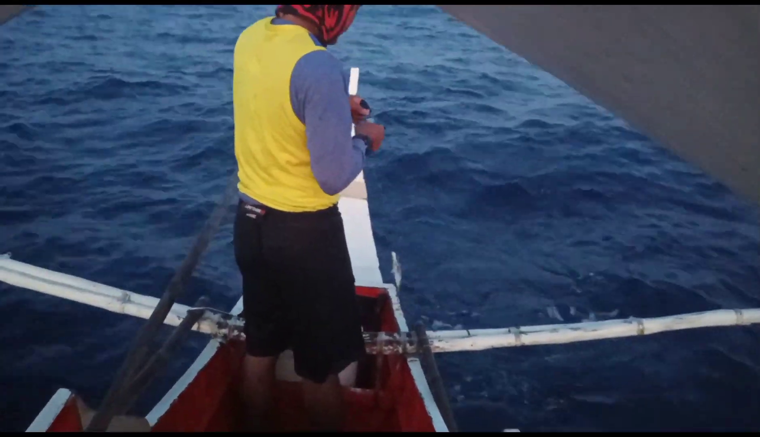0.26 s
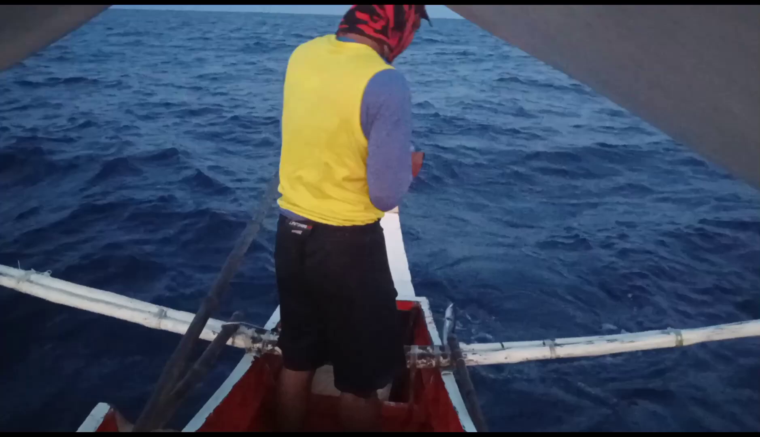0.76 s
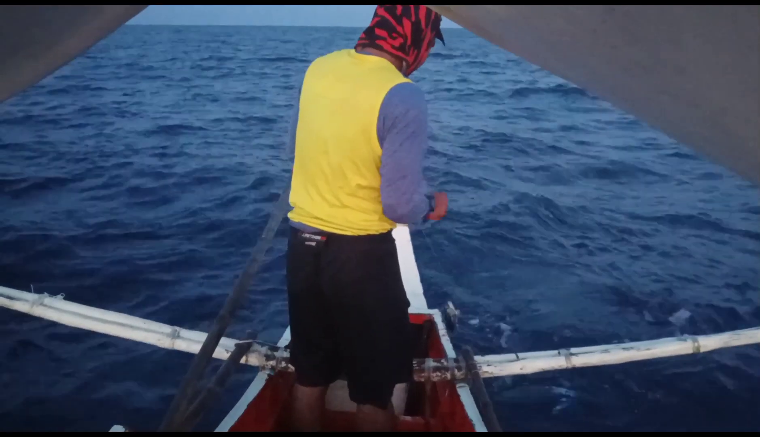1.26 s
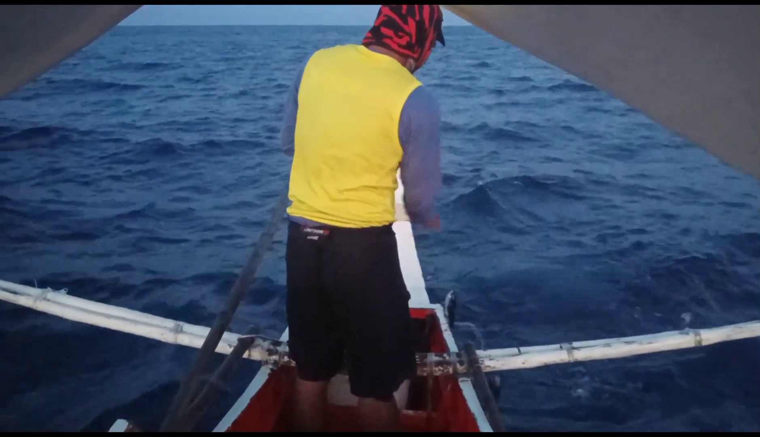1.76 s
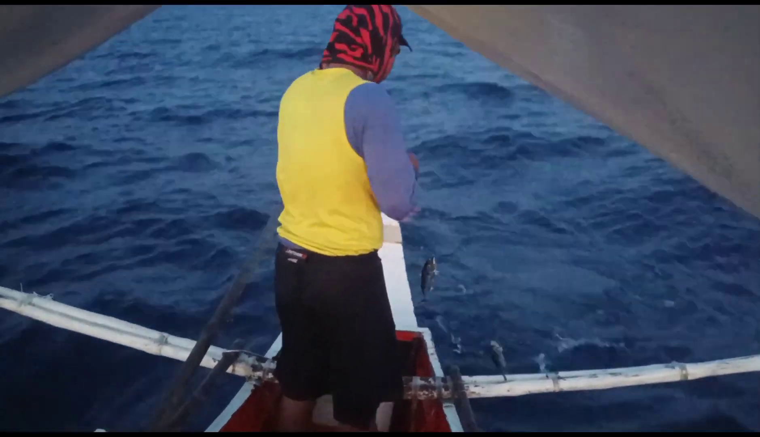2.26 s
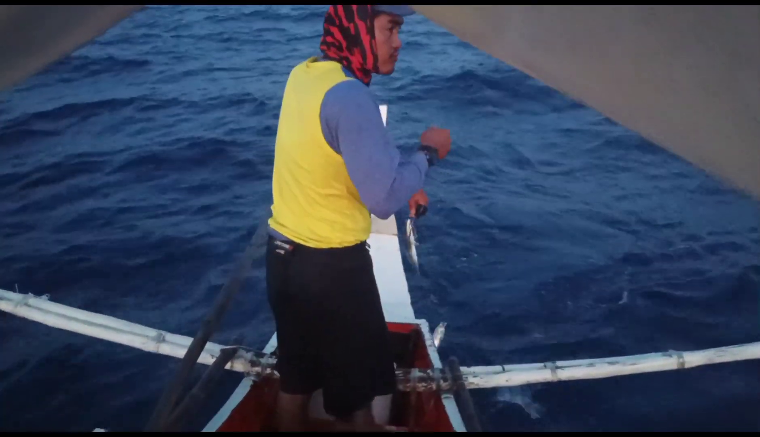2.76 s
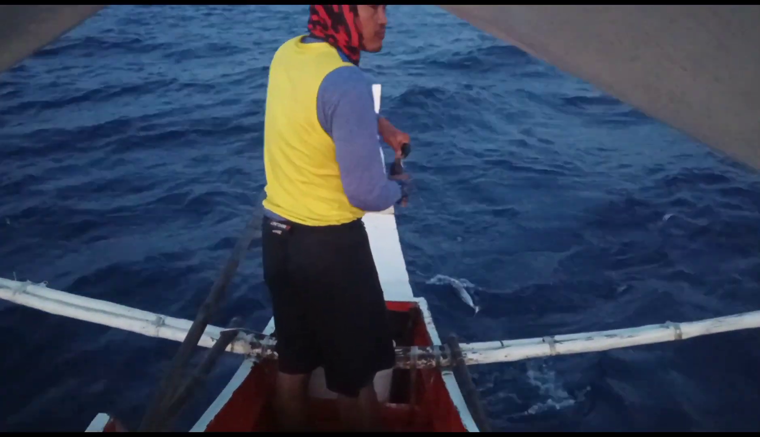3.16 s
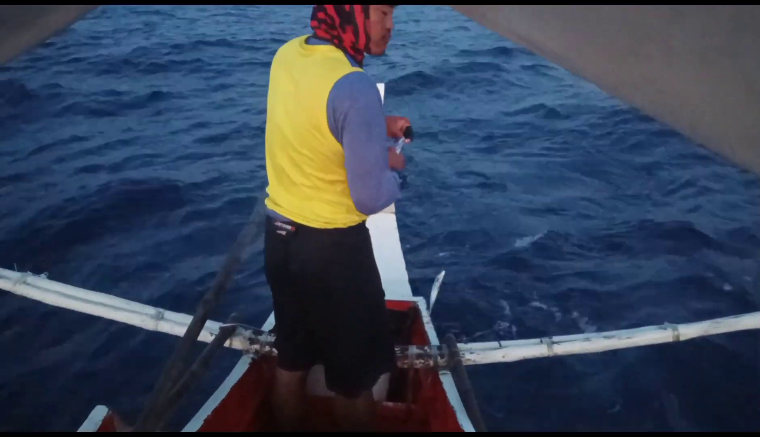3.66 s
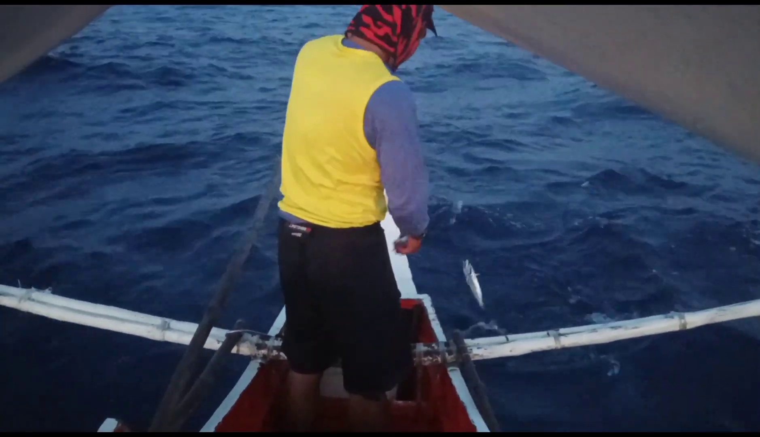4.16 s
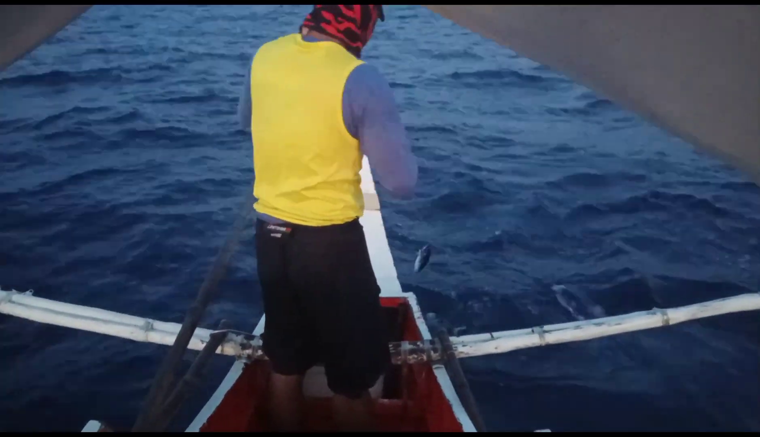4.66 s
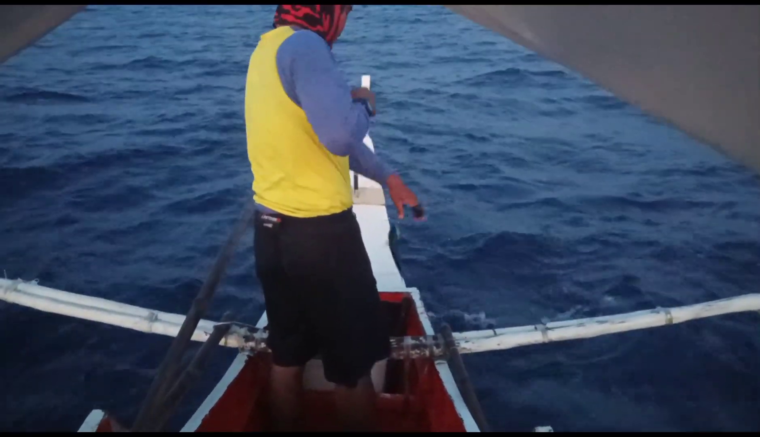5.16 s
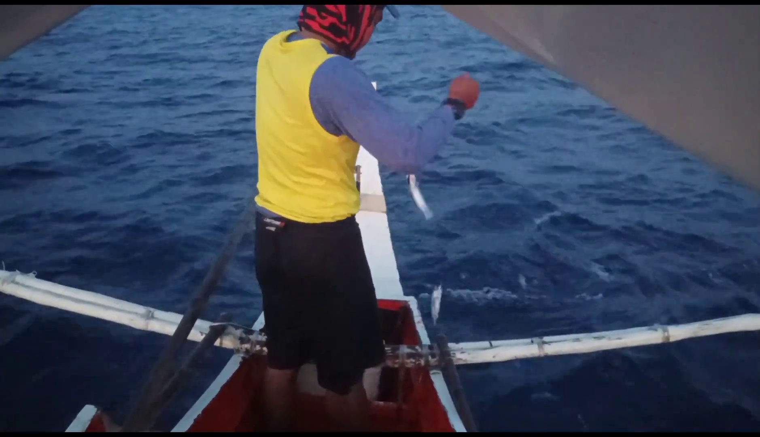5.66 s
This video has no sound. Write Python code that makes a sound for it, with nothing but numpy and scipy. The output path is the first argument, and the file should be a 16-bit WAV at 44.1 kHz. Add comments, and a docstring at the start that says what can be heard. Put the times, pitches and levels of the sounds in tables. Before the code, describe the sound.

Close, exposed stereo microphone aboard a fishing boat: fast regular chugging with hollow upward whoops and rattling metal starts prominently, then turns duller and fainter. Fluttering wind rumble, pops and overloaded crackles dominate the right side, while the left is more sheltered. Short bright spray splashes come and go, with the engine partly returning after about four seconds. No speech.

```python
"""Rising whoops from a slow one-cylinder engine come first, each with a burst of metallic clatter.
The engine drives a small outrigger boat through open sea. Swept sines make the whoops; noise and ticks
through casing and ring filters make the clatter. Decaying noise bursts make the spray off the bow, and
damped sines a knock on the hull. Wind, as noise read at a fluttering speed, buffets the microphone,
mostly its right port, and overloads the limiter."""
import sys
import numpy as np
from scipy import signal
from scipy.fft import rfft, irfft, next_fast_len
from scipy.io import wavfile
from scipy.ndimage import uniform_filter1d, minimum_filter1d

SR = 44100
rng = np.random.default_rng(int(sys.argv[2]) if len(sys.argv) > 2 else 0)


def unload_audio(sound):
    """Save the sound as a 16-bit wav file, at the path given as the first command line argument."""
    columns = np.transpose(np.atleast_2d(sound))
    # keep every value between -1 and 1, then stretch to whole-number steps
    steps = np.round(np.clip(columns, -1, 1) * 32767)
    wavfile.write(sys.argv[1], SR, steps.astype(np.int16))


N = 261072
TIME = np.arange(N) / SR  # s
BAND_EDGE_HZ = 15800
FIRST_FIRING_S = -.022

# Levels in the tables are relative: each source sets its own trim.
# wind at the sheltered left port: (time [s], level [dB])
LEFT_WIND_LEVEL = [(0, -15), (.4, -26), (.6, -11.5), (.95, -18.5), (1.15, -9.5), (1.7, -19), (1.85, -10),
                   (2.12, -7), (2.3, -20.5), (2.85, -20.5), (3.03, -16), (3.2, -19), (3.37, -11.5),
                   (3.6, -29.5), (4.15, -9.5), (4.65, -13.5), (4.97, -2), (5.15, -15.5), (5.55, -8.5),
                   (5.72, -21.5), (5.9, -12.5)]
# wind at the exposed right port: (time [s], level [dB], eddy rate before scaling [Hz])
RIGHT_WIND_COURSE = [(0, -3.5, 220.5), (0.301, -18.5, 220.3), (0.681, -17, 220.5), (.8, -1.5, 221.7),
                     (1, -7, 319.6), (1.3, -5.5, 339.5), (1.45, -11, 380.2), (1.65, -6, 399.6),
                     (2.198, -5.5, 400.1), (2.45, -11, 399.3), (2.8, -3, 320.5), (3.199, -1.5, 270.3),
                     (3.5, -6, 310.2), (3.85, -2.5, 400.9), (4.28, -5.5, 219.7), (4.651, -5, 381.8),
                     (4.921, -4.5, 219.3), (5.2, -1, 280.4), (5.5, -8.5, 309.7), (5.9, -6.5, 309.5)]
# response of a port to wind: (frequency [Hz], level [dB])
PORT_RESPONSE = [(15, -45), (30, -54), (50, -18), (80, -2.5), (130, 1), (250, -1), (600, 0.5), (1500, 2.5),
                 (4000, 7.5), (9000, -1)]
# the hardest buffets on the right port: (time [s], level [dB])
HARD_BUFFETS = [(1.022, -12), (1.396, -10.5), (1.526, -14), (1.579, -11.5), (1.663, -12), (1.721, -10.5),
                (1.861, -13), (1.937, -10.5), (1.999, -10.5), (2.1, -10), (2.152, -11.5), (2.242, -11),
                (2.432, -11.5), (2.475, -13), (2.512, -10.5), (2.794, -13), (3.062, -7.5), (3.808, -14),
                (4.021, -11), (4.46, -11.5), (4.668, -11.5), (5.154, -11.5), (5.236, -9), (5.258, -9.5),
                (5.451, -8.5), (5.462, -8.5), (5.751, -8.5)]
# swelling and fading wash of spray off the bow: (time [s], level [dB])
BOW_WASH = [(0, -35), (.42, -26.5), (.6, -37), (1.0, -46), (1.4, -54.5), (2.85, -50.5), (2.96, -45.5),
            (3.35, -36.5), (3.45, -47.5), (3.65, -41.5), (3.9, -66), (4.2, -48), (4.33, -23.5), (4.4, -41),
            (4.75, -46.5), (5.9, -52.5)]
# the larger splashes: (time [s], level [dB], decay time constant [s])
SPLASHES = [(.239, -38, 0.033), (.271, -10.5, 0.013), (0.285, -37, 0.013), (0.324, -16, 0.015),
            (0.721, -18.5, 0.0017), (1.56, -30, .006), (3.035, -22.5, 0.0058), (3.482, -22, 0.017),
            (3.538, -14.5, 0.0049), (3.79, -33.5, 0.0033), (3.937, -28, 0.014), (4.049, -24.5, 0.025),
            (4.087, -18.5, 0.013), (4.165, -20, 0.023), (4.89, -21.5, 0.017), (5.297, -27, .019),
            (5.547, -16, 0.014), (5.771, -27, 0.0037)]
# colour of spray: (frequency [Hz], level per hertz [dB])
SPRAY_COLOUR = [(500, 0), (2000, 5.5), (4000, 5), (5500, 7.5), (8000, -9.5), (10500, -8), (13500, -16),
                (15500, -9), (16500, 14)]
# knock of a wave on the hull: (time [s], level [dB], lowest mode [Hz])
HULL_KNOCKS = [(0.439, -8, 983)]
# engine speed: (time [s], firing rate [firings per second])
ENGINE_SPEED = [(0, 6.48), (.5, 6.46), (.9, 6.62), (2.4, 6.54), (3, 6.68), (3.7, 6.6), (4.25, 6.81),
                (4.65, 6.49), (5.9, 6.4)]
# clatter through one cycle, before depth scaling: (time after firing [s], level [dB])
CYCLE_SHAPE = [(0, -12), (.024, -14.5), (.036, -6.5), (.05, 2.3), (.064, 5.3), (.078, 1), (.093, -2.3),
               (.108, -10), (.13, -13.5), (.17, -13.5)]
# loudness of the machinery: (time [s], level [dB])
MACHINERY_LEVEL = [(0, -17), (.6, -15.5), (.9, -28), (1.05, -27.5), (1.35, -37.5), (1.81, -38.5),
                   (1.96, -32.5), (2.27, -43), (2.57, -37), (2.88, -30.5), (3.32, -29), (3.48, -32.5),
                   (3.85, -31), (4.22, -23.5), (4.4, -31), (4.68, -33.5), (4.84, -26.5), (5.4, -30.5),
                   (5.61, -38), (5.77, -27)]
# hiss of escaping gas: (frequency [Hz], level per hertz [dB])
HISS_COLOUR = [(500, -13), (1500, -13), (2500, -1), (3300, 19.5), (4200, 0.5), (5500, 6.5), (6400, 5),
               (8000, -14), (10500, -4.5), (13500, -33), (15500, -20)]
# engine casing: (frequency [Hz], level per hertz [dB])
CASING_COLOUR = [(25, -38), (70, 15), (150, 15), (300, -10), (430, 10), (690, 10.5), (870, 4), (1100, 7.5),
                 (1500, 5), (2300, 1.5), (3200, -7), (4300, -10.5), (5000, -11.5), (6500, -15), (8000, -55),
                 (10500, -29.5), (13500, -48), (15500, -24)]
# ringing parts of the engine: (frequency [Hz], level [dB], time to fall 60 dB [s])
RINGING_PARTS = [(734, -6.5, 0.1), (1467, 2.5, 0.033), (1607, -1, 0.091), (2016, -2, 0.21), (2347, 0, 0.1),
                 (2760, -3, 0.058), (2640, 0.5, 0.027), (3303, 0, 0.11), (3580, -6.5, 0.06)]
# the exhaust pipe lets its low notes out first: (time after firing [s], pitch [Hz], level [dB])
WHOOP_SWEEP = [(0, 88.7, -23.5), (.008, 100.7, -8), (0.015, 128, -1), (0.031, 177, -6.5),
               (0.037, 212, -13.5), (0.043, 266, -7), (0.065, 305, -16.5), (0.076, 340, -39),
               (0.089, 353, -67)]
# loudness of the exhaust: (time [s], level [dB])
WHOOP_LEVEL = [(0, 2), (.14, 5), (.29, 3), (.44, 9.5), (.62, 10), (.76, 3), (.9, -1), (1.06, -1.5),
               (1.5, -7), (2.3, -23), (3.0, -7), (3.65, -5.5), (3.93, -2.5), (4.22, 1.5), (4.4, -9),
               (4.67, -22.5), (4.84, -7.5), (5.14, -5.5), (5.3, 3), (5.46, -28), (5.8, -17)]
# exhaust reflected by hull and awning: (delay [s], level [dB])
EXHAUST_ECHOES = [(0.0118, -16.5), (.026, -11)]


def amp(db):
    """Turns decibels into gain."""
    return 10 ** (np.asarray(db) / 20)


def unit(x):
    """Scales to rms 1."""
    return x / np.sqrt(np.mean(x ** 2) + 1e-20)


def along(curve, s):
    """Reads a curve of (time, value) points at the times s."""
    return np.interp(s, *np.transpose(curve))


def colour(x, points):
    """Filters by a spectrum of (Hz, dB) points, joined on a log frequency axis."""
    hz, db = np.transpose(points)
    size = next_fast_len(N + 4096)
    f = np.fft.rfftfreq(size, 1 / SR)
    gain = amp(np.interp(np.log(f + 1), np.log(hz), db))
    return irfft(rfft(x, size) * gain, size)[..., :N]


def wander(hz):
    """Smooth random drift of rms 1: noise low-passed at hz."""
    lowpass = signal.butter(2, hz, fs=SR, output="sos")
    settled = signal.sosfilt(lowpass, rng.standard_normal(2 * N))[N:]
    return unit(settled)


def add(mix, s, sound):
    """Mixes a sound in at time s, trimming what falls outside."""
    start = round(s * SR)
    sound = sound[max(-start, 0):]
    part = mix[max(start, 0):][:len(sound)]
    part += sound[:len(part)]


def scattered(x, t60, share):
    """Nearby boards add a dense spatter of early reflections, which ripples the spectrum."""
    t = np.arange(SR // 25) / SR
    taps = rng.standard_normal(len(t)) * amp(-60 * t / t60)
    return x + share * signal.oaconvolve(x, taps / np.linalg.norm(taps))[:N]


def fast_air(calm_hz=220, full_hz=380):
    """How hard the air rushes past the right port, 0-1, from its tabled eddy rate."""
    s, _, hz = np.transpose(RIGHT_WIND_COURSE)
    return np.clip((np.interp(TIME, s, hz) - calm_hz) / (full_hz - calm_hz), 0, 1)


def eddies(hz, fine_db=-21):
    """A frozen field of turbulence swept past a port: faster air gives a higher rumble."""
    steps = 32  # field samples per eddy
    place = np.cumsum(hz) * steps / SR
    white = rng.standard_normal(int(place[-1]) + 2)
    coarse = unit(signal.lfilter(*signal.butter(3, 2 / steps), white))
    fine = unit(signal.lfilter(*signal.butter(2, 4 / steps), white[::-1]))
    return np.interp(place, np.arange(len(white)), coarse + amp(fine_db) * fine)


def gusts(db, hz, flutter_hz, flutter_db, brightening):
    """The air speed flutters, making the rumble louder and brighter together."""
    flutter = 2 * np.tanh(wander(flutter_hz) / 2)  # stays within -2 to 2
    rumble = eddies(hz * np.exp(brightening * flutter)) * amp(flutter_db * flutter)
    return amp(db) * unit(colour(rumble, PORT_RESPONSE))


def pops(level, per_s=24, width=0.00049):
    """Single small vortices pass the port, each one sharp swing of pressure."""
    t = np.arange(-SR // 200, SR // 200) / SR
    out = np.zeros(N)
    for when, size, span in rng.random((int(per_s * N / SR), 3)):
        u = t / (width * (.5 + span))
        height = np.sign(size - .5) * (.5 + abs(size - .5))
        add(out, when * N / SR, height * (1 - u ** 2) * np.exp(-u ** 2 / 2))
    return level * out


def wind(left_db=-1, right_db=-2.5, left_hz=200, rate_share=.82, pop_db=9, surge_db=3.4, surges_per_s=6):
    """The sheltered left port rumbles; the exposed right port surges, flaps, and pops in fast air."""
    s, *columns = np.transpose(RIGHT_WIND_COURSE)
    right, hz = (np.interp(TIME, s, c) for c in columns)
    right = right + surge_db * wander(surges_per_s)
    popping = pops(amp(right + pop_db) * fast_air())
    left_rumble = gusts(along(LEFT_WIND_LEVEL, TIME) + left_db, left_hz,
                        flutter_hz=21.69, flutter_db=4.5, brightening=.3)
    right_rumble = gusts(right + right_db, hz * rate_share,
                         flutter_hz=44.16, flutter_db=5.5, brightening=.34)
    return np.array([left_rumble, right_rumble + popping])


def buffets(lesser_db=-15, click_db=-14, click_s=0.00013, click_left_db=-5):
    """Fast eddies flap the air at the right port; the overloaded microphone clicks at the crest."""
    level_db, spread_db = 1.8, 4
    width = .0035  # s, standard deviation of the swell
    flap_hz, scatter, uneven = 720, .5, .3
    # lesser buffets come by chance, more often in fast air
    tries_per_s = 7
    rush = fast_air()
    lesser = [(when * N / SR, lesser_db + spread_db * (size - .5))
              for when, size, luck in rng.random((int(tries_per_s * N / SR), 3))
              if luck < rush[int(when * N)]]
    t = np.arange(-SR // 50, SR // 50) / SR
    level, crests = np.zeros((2, N))
    for s, db in HARD_BUFFETS + lesser:
        add(level, s + t[0], amp(db) * np.exp(-(t / width) ** 2 / 2))
        add(crests, s + t[0], amp(db) * np.exp(-abs(t) / click_s))
    # the harder the buffet, the faster the flapping
    hz = flap_hz * (.6 + 1.9 * level) * np.exp(scatter * 2 * np.tanh(wander(800) / 2))
    flap = np.sin(2 * np.pi * np.cumsum(hz) / SR) * (1 + uneven * wander(360))
    flapping = amp(level_db) * level * unit(flap)
    clicks = crests * unit(signal.lfilter(*signal.butter(1, 2000, fs=SR), rng.standard_normal(N)))
    return np.outer([0, 1], flapping) + amp(click_db) * clicks * amp([[click_left_db], [0]])


def spray(level_db=2, grain_db=4, right_db=-4, rise=0.00048,
          stray_db=-37, stray_spread_db=12, stray_decay=0.002):
    """Splashes and stray droplets land on sea and deck over the wash of the bow."""
    strays_per_s = 3
    strays = [(when * N / SR, stray_db + stray_spread_db * (size - .5), stray_decay)
              for when, size in rng.random((int(strays_per_s * N / SR), 2))]
    level = amp(along(BOW_WASH, TIME))
    t = np.arange(SR // 2) / SR
    for s, db, decay in SPLASHES + strays:
        onset = 1 - np.exp(-t / (rise + 0.09 * decay))
        add(level, s, amp(db + level_db) * np.exp(-t / decay) * onset)
    grain = unit(amp(grain_db * wander(740)))
    drops = level * rng.standard_normal((2, N)) * grain
    drops = np.array([scattered(port, .01, .7) for port in drops])
    return colour(drops, SPRAY_COLOUR) * amp([[0], [right_db]])


def knocks(level_db=0, decay=0.0026, right_db=-3, crack_db=-5):
    """A wave slaps the hull: a wet crack and a few heavily damped plank modes."""
    t = np.arange(SR // 16) / SR
    wet_band = signal.butter(2, [1500, 5000], "band", fs=SR)
    out = np.zeros(N)
    for s, db, hz in HULL_KNOCKS:
        planks = sum(np.sin(2 * np.pi * hz * k * t) / k for k in (1, 1.23, 1.9, 2.8))
        crack = unit(signal.lfilter(*wet_band, rng.standard_normal(len(t))))
        add(out, s, amp(db + level_db) * np.exp(-t / decay) * (planks + amp(crack_db) * crack))
    return out * amp([[0], [right_db]])


def firings():
    """The moments at which the cylinder fires, once each cycle."""
    cycles = np.cumsum(along(ENGINE_SPEED, TIME + FIRST_FIRING_S)) / SR
    return FIRST_FIRING_S + np.interp(np.arange(int(cycles[-1]) + 1), cycles, TIME)


def cycle_level(depth):
    """Gain of the machinery through the firing cycle; depth scales the swing in decibels."""
    starts = firings()
    fired = starts[np.searchsorted(starts, TIME) - 1]  # latest firing
    db = along(MACHINERY_LEVEL, fired) + depth * along(CYCLE_SHAPE, TIME - fired)
    return uniform_filter1d(amp(db), size=300)


def gas_hiss(level_db=-13):
    """Coloured noise for escaping gas, which hisses at the height of each cycle."""
    jet = np.array([scattered(port, .012, .8) for port in rng.standard_normal((2, N))])
    return amp(level_db) * cycle_level(depth=1.9) * unit(colour(jet, HISS_COLOUR))


def clatter(level_db=7, ticks_per_s=600, tick_share=0.93):
    """Dense metal ticks and rushing gas shake the casing and ring the engine's parts."""
    ring_db = -9.5
    ticks = unit(rng.standard_normal(N) * (rng.random(N) < ticks_per_s / SR))
    t = np.arange(SR // 8) / SR
    out = []
    for port in range(2):
        # same tick times at both ports, with separate signs and gas noise
        drive = rng.standard_normal(N) + tick_share * ticks * rng.choice([-1, 1], N)
        modes = 0
        for hz, db, t60 in RINGING_PARTS:
            tone = np.sin(2 * np.pi * (hz * t + rng.random()))
            modes = modes + amp(db - 60 * t / t60) / np.sqrt(t60) * tone
        casing = colour(scattered(drive, .02, .5), CASING_COLOUR)
        ringing = signal.oaconvolve(drive, modes)[:N]
        out.append(unit(casing) + amp(ring_db) * unit(ringing))
    return amp(level_db) * cycle_level(depth=0.8) * np.array(out)


def patchy(x, spread_db):
    """Turbulent gas: the colour shifts in patches a few hundred hertz wide and some 20 ms long."""
    z = signal.stft(x, nperseg=256)[2]
    patches = uniform_filter1d(rng.standard_normal(z.shape[1:]), size=3, axis=0)
    patches = uniform_filter1d(patches, size=8, axis=1)
    return signal.istft(z * amp(spread_db * unit(patches)), nperseg=256)[1][:, :N]


def exhaust(level_db=-1, pitch_spread=0.033, rough=0.5, waver=0.14):
    """Each firing leaves the pipe as a short upward sweep, never quite the same twice."""
    age, hz, db = np.transpose(WHOOP_SWEEP)
    t = np.arange(0, age[-1], 1 / SR)
    out = np.zeros(N)
    for s in firings():
        bend, swell = (np.interp(t, np.linspace(0, t[-1], len(knots)), knots)
                       for knots in rng.standard_normal(size=(2, 18)))
        pitch = np.interp(t, age, hz) * (1 + pitch_spread * rng.standard_normal() + waver * bend)
        level = amp(along(WHOOP_LEVEL, s) + np.interp(t, age, db)) * (1 + rough * swell)
        add(out, s, level * np.sin(2 * np.pi * np.cumsum(pitch) / SR))
    return amp(level_db) * out


def pipe(bark_db=-5, bark_width_hz=220):
    """The whoop, its reflections, and a hoarse bark of gas that follows it out of the pipe."""
    bark_hz = 640
    whoop = exhaust()
    out = whoop.copy()
    for delay, db in EXHAUST_ECHOES:
        add(out, delay, amp(db) * whoop)
    edges = [bark_hz - bark_width_hz / 2, bark_hz + bark_width_hz / 2]
    band = signal.butter(2, edges, "band", fs=SR, output="sos")
    bark = unit(signal.sosfilt(band, rng.standard_normal(N)))
    return out + amp(bark_db) * cycle_level(depth=.9) * bark


def scene(exhaust_right_db=0.0, clatter_right_db=1.5):
    """Mixes wind, sea and engine at the two ports."""
    air = wind() + buffets()
    sea = spray() + knocks()
    machinery = patchy(clatter() + gas_hiss(), spread_db=2.8)
    engine = pipe() * amp([[0], [exhaust_right_db]]) + machinery * amp([[0], [clatter_right_db]])
    return air + sea + engine


def record(dry, recovery_db_per_s=330):
    """A fast limiter ducks both channels at overloads, crests still clip; then the band limit."""
    ceiling_db = .25
    over_db = np.maximum(20 * np.log10(abs(dry).max(0) + 1e-9) - ceiling_db, 0)
    held_db = -minimum_filter1d(-over_db, size=16)  # running maximum
    # the duck deepens with each overload, then recovers at a steady rate
    fall = TIME * recovery_db_per_s
    duck_db = uniform_filter1d(np.maximum.accumulate(held_db + fall) - fall, size=16)
    limited = np.clip(dry * amp(-duck_db), -1, 1)
    lowpass = signal.firwin(401, BAND_EDGE_HZ, window=("kaiser", 8), fs=SR)
    return signal.oaconvolve(limited, lowpass[None], "same")


dry = scene()
out = record(dry)
unload_audio(out)
```